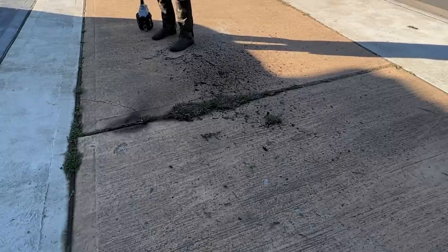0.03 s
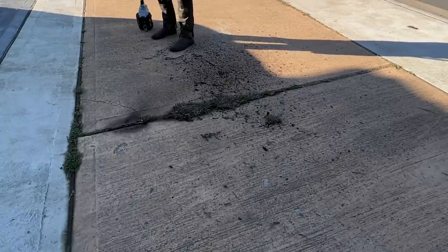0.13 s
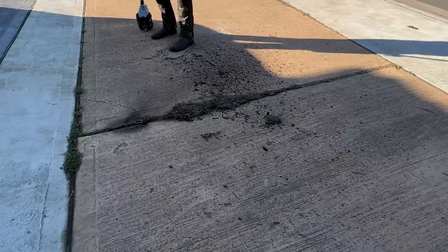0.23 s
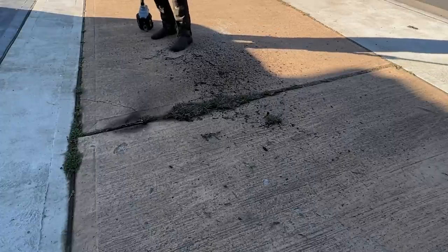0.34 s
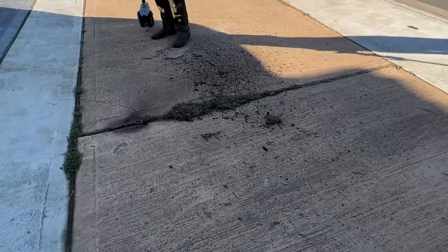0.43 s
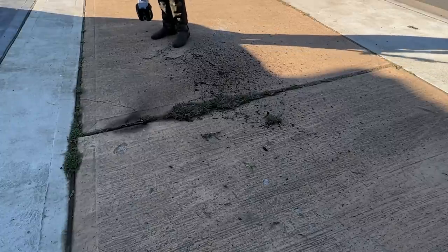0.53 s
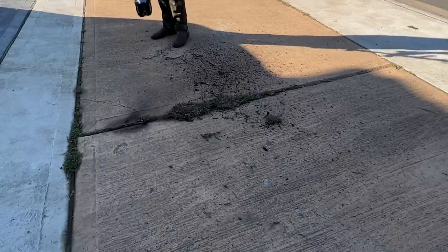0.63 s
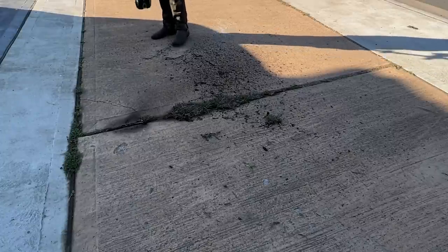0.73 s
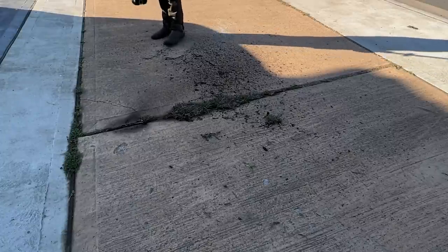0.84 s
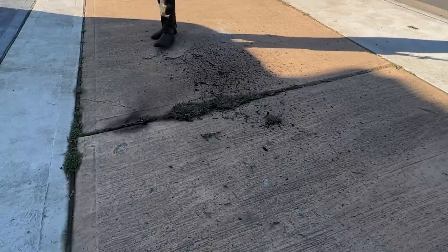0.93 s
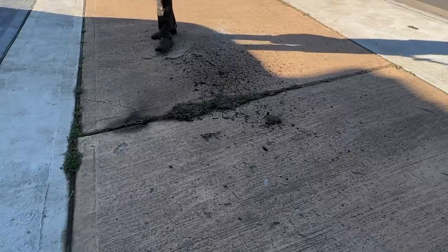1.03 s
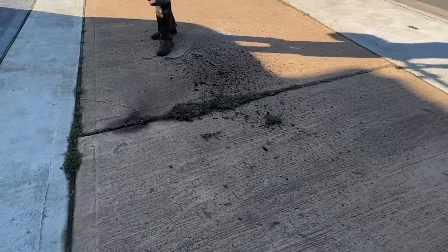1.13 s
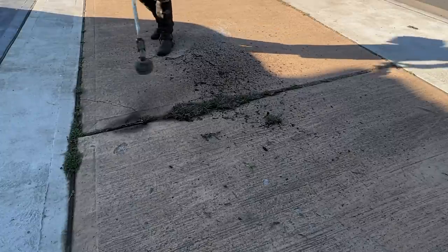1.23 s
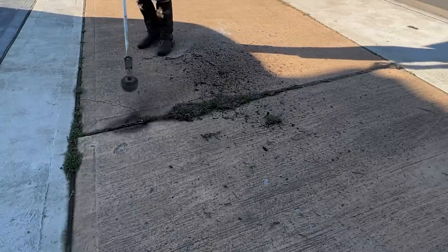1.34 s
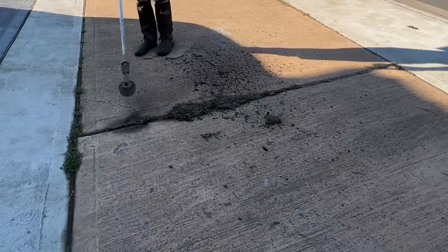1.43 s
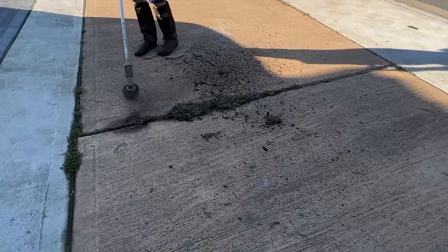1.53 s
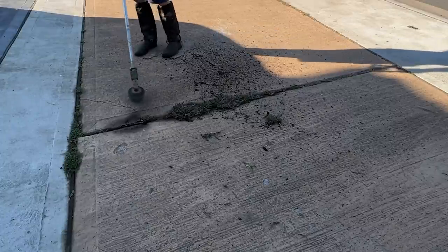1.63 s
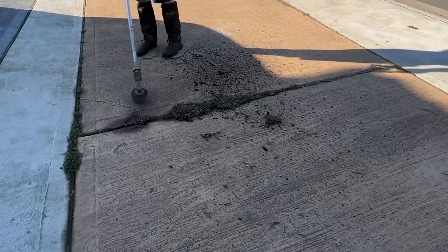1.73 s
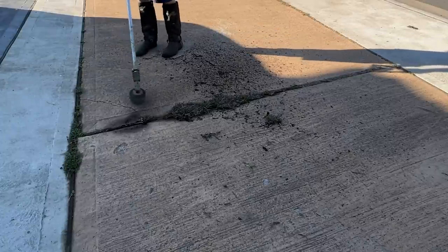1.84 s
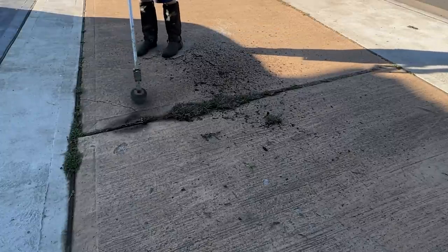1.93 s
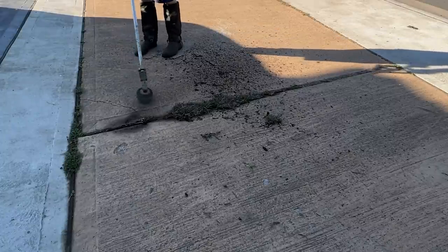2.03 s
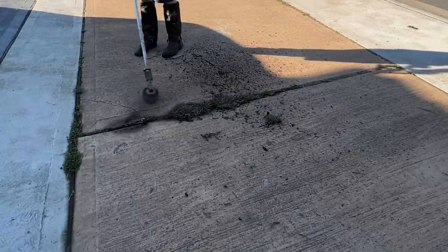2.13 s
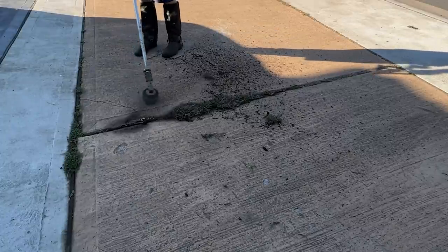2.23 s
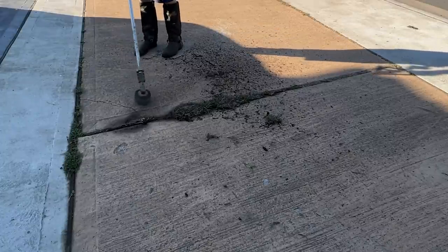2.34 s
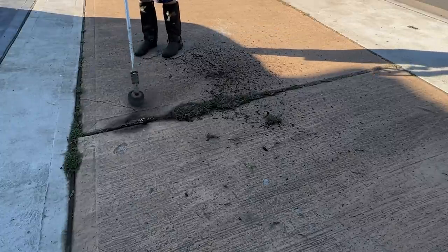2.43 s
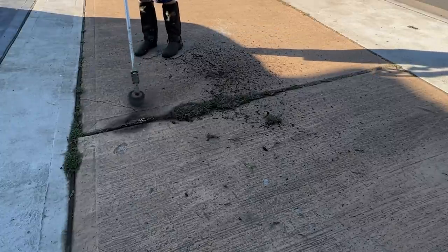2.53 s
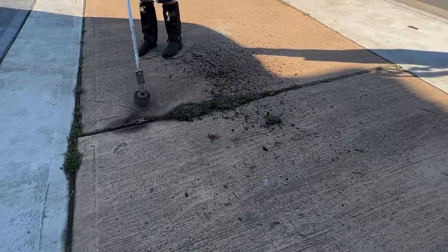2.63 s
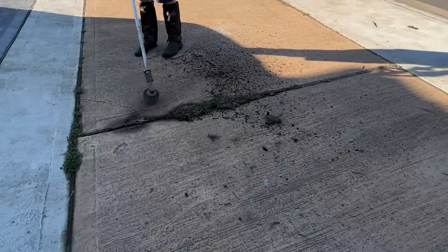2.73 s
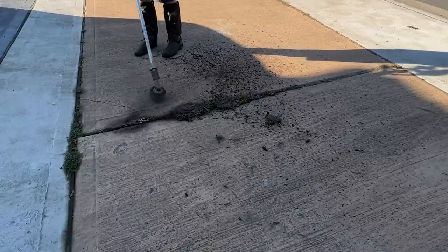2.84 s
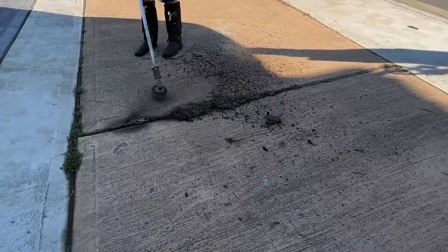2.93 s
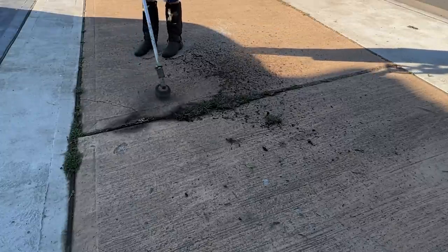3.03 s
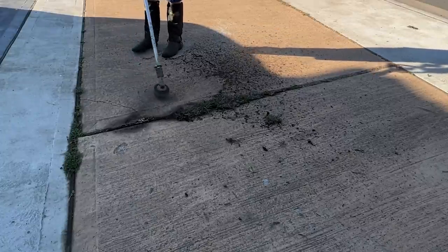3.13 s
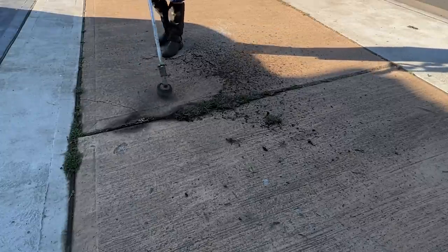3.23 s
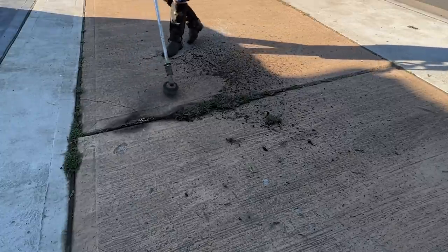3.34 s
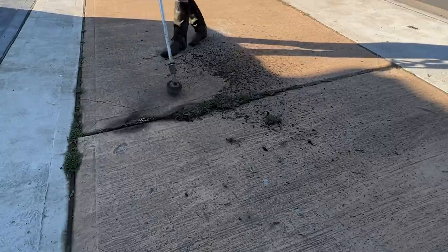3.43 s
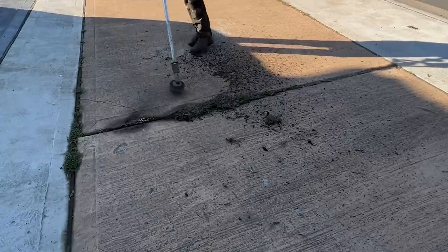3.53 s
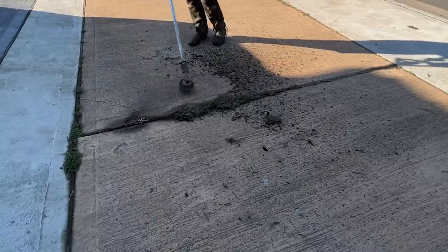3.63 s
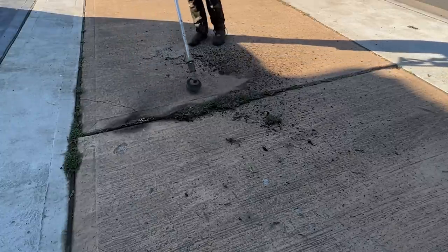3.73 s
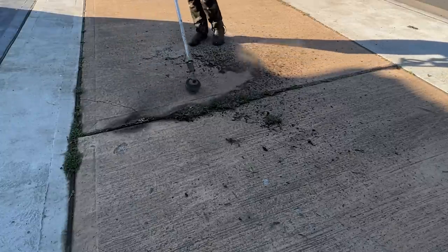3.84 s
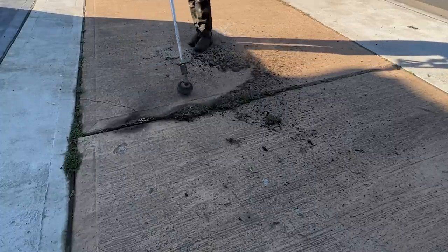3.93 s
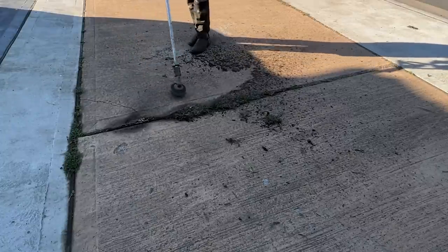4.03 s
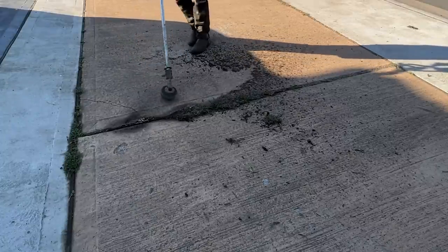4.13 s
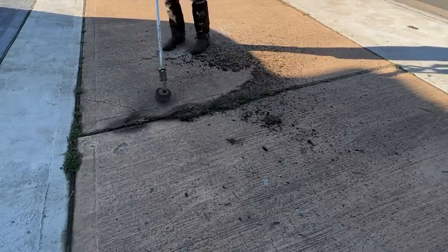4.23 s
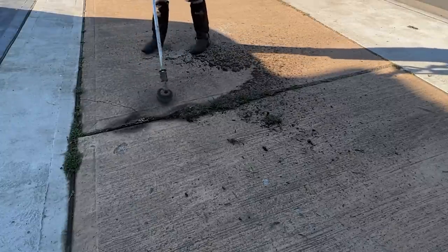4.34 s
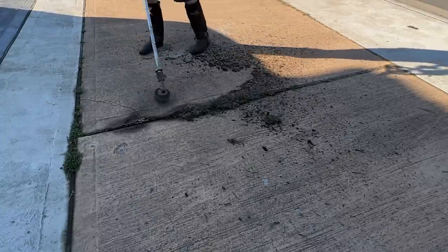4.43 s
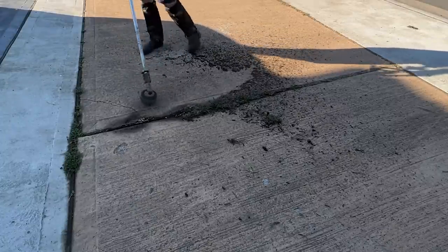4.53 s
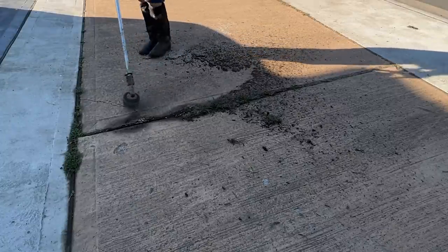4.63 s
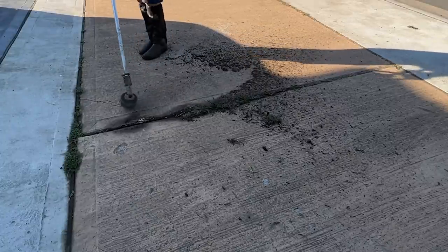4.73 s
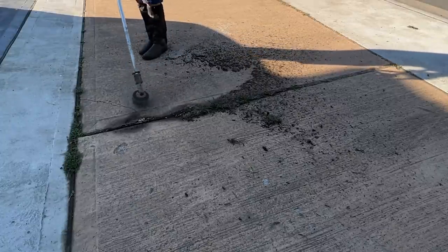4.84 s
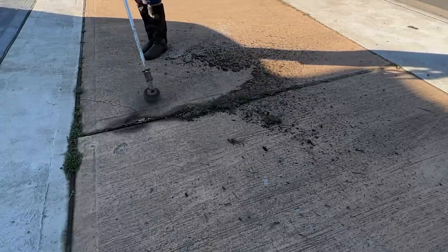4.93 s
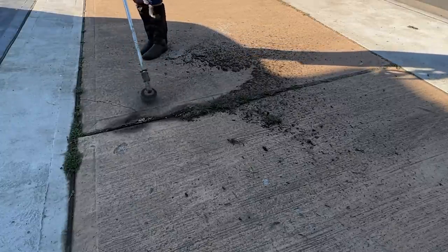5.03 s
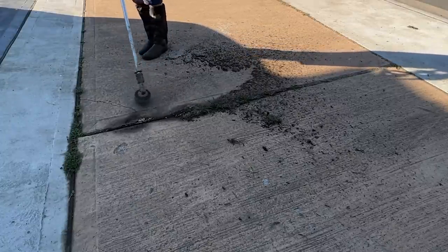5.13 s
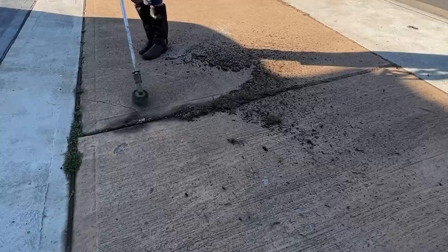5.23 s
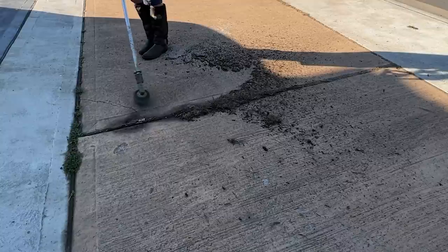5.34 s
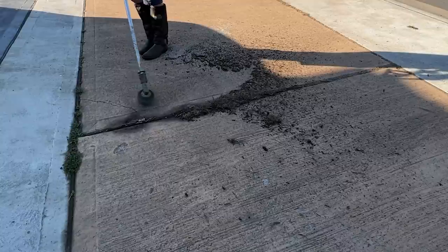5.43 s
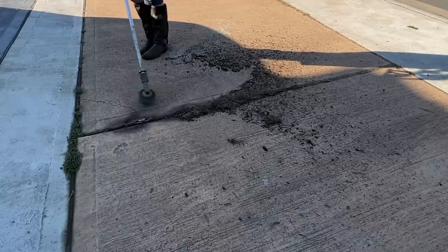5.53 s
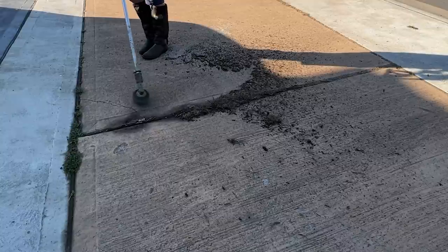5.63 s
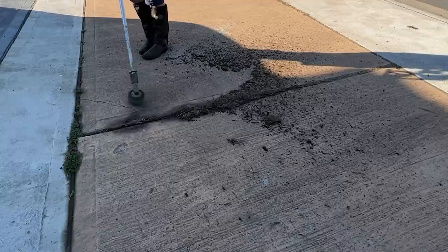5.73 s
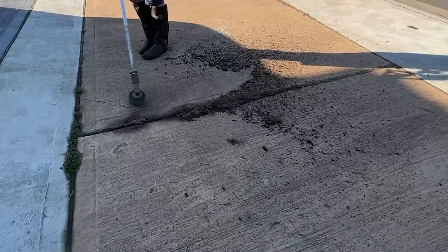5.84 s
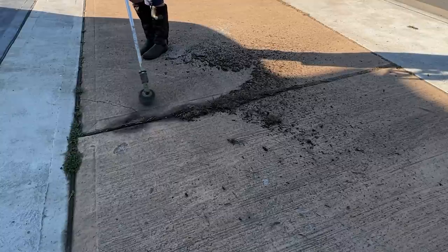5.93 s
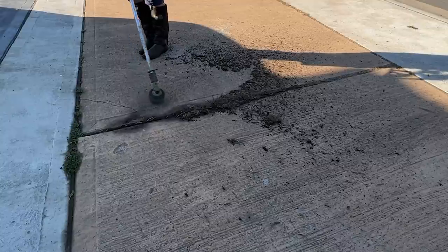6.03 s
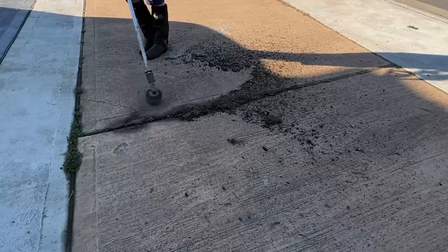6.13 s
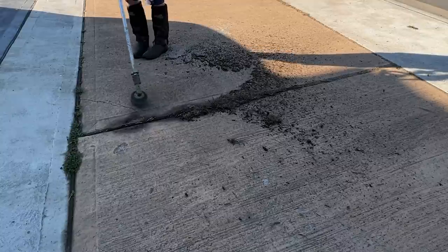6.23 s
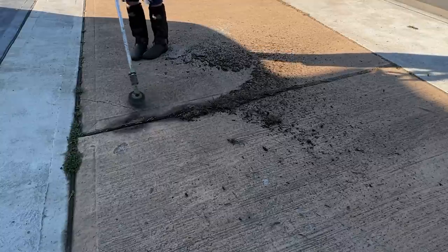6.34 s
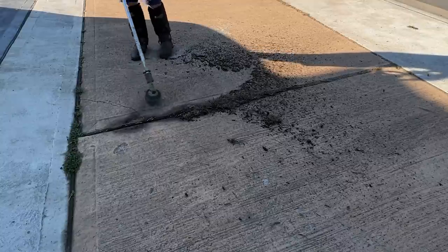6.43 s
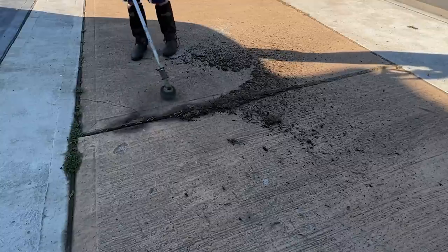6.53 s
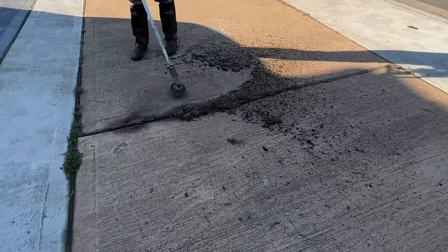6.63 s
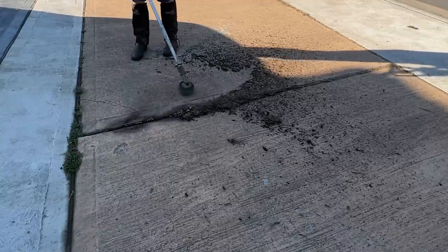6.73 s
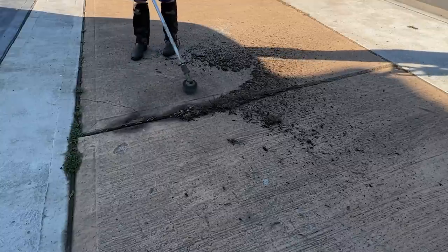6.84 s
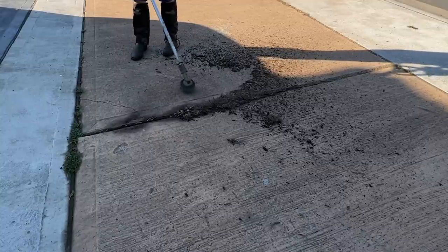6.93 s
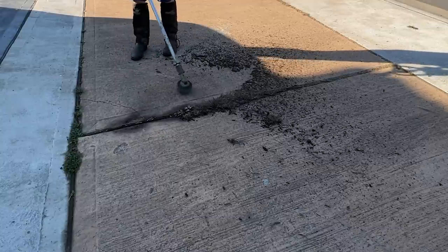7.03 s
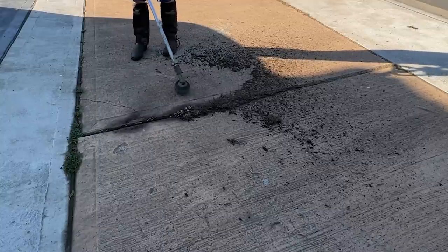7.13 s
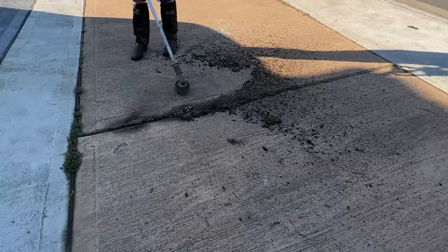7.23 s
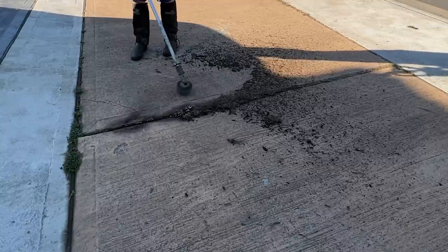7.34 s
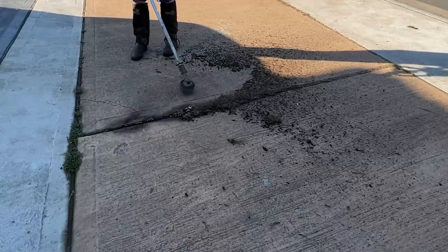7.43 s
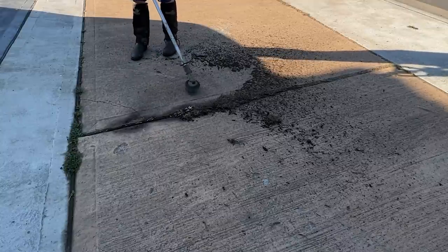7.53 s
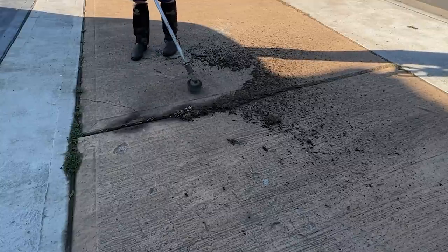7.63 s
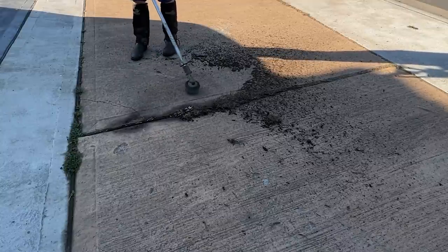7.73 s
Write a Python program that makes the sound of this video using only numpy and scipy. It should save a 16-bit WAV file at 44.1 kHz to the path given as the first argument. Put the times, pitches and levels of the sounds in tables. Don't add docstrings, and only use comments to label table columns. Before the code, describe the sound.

Soles scuff gravel over a faint far rumble for a second, then a short clutch squeal and knock start a battery trimmer. Its pitch climbs in half a second to a sharp electric whine with a strong whistling rush of spinning line. Repeated bites rasp through weeds, sagging the motor a little and spraying grit on hard ground. Open air, fairly close stationary microphone, dry sound, no stop at the end.

```python
import sys
import numpy as np
from scipy import signal
from scipy.fft import rfft, irfft, next_fast_len
from scipy.io import wavfile
from scipy.ndimage import uniform_filter1d

SR = 44100
rng = np.random.default_rng(int(sys.argv[2]) if len(sys.argv) > 2 else 0)


def undo_db(level):
    steps = np.asarray(level, float) / 20
    return 10 ** steps


def output_pcm(signal):
    pcm = np.clip(np.atleast_2d(signal).T, -1, 1) * 32767
    wavfile.write(sys.argv[1], SR, np.round(pcm).astype(np.int16))


N = 343539
TIME = np.arange(N) / SR
EARLY = TIME[:2 * SR]
FRAME_S = np.arange(N // 128 + 5) * 128 / SR
BIN_HZ = np.fft.rfftfreq(512, 1 / SR)[:, None]

# pitch_hz, level_db
RUMBLE_SPECTRUM = [(12, -70), (20, -42), (37, -14), (135, 0), (174, -5.5), (392, -11.5), (543, -10),
                   (600, -40), (780, -47), (1320, -120)]
RUMBLE_DB = -57
# pitch_hz, level_db
HUM_TONES = [(70.5, -66), (141, -61.5)]
# pitch_hz, density_db (per Hz)
SCUFF_SPECTRUM = [(150, -76), (250, -15), (395, -22), (540, -6), (737, -13.5), (1020, -10), (1380, -14),
                  (1840, -7), (2310, -21.5), (3000, -19), (3900, -29), (6600, -120)]
# pitch_hz, density_db (per Hz)
GRAVEL_SPECTRUM = [(1060, -31), (1800, -15), (2330, -18.5), (4780, -18.5), (6070, -25), (8730, -35),
                   (15000, -62)]
# start_s, length_s, scuff_db, gravel_db
STEPS = [
    (0, 0.045, -70, -60),
    (.07, .17, -57, -69),
    (.23, 0.054, -59, -65),
    (.355, 0.12, -55, -58),
    (.44, .14, -53.5, -56),
    (.76, 0.2, -62, -67),
    (.92, .13, -66, -67),
    (1.065, 0.042, -46, -60),
    (1.1, .06, -58, -41),
]
STEP_EDGE_S, STILL_SCUFF_DB, STILL_GRAVEL_DB = 0.039, -58, -73
# start_s, level_db, pitch_hz
STONES = [
    (.025, -45, 6000),
    (.25, -57, 7950),
    (.36, -47, 5500),
    (.62, -48, 6000),
    (.745, -39, 4060),
    (1.025, -61, 10000),
]

# time_s, half_length_s, squeal_db, knock_db
THROBS = [
    (1.07, 0.0038, -40.5, -64),
    (1.086, 0.0072, -34.5, -43.5),
    (1.108, 0.008, -48, -64),
]
SQUEAL_HZ, KNOCK_LEAD_S = 3350, 0.0077
# pitch_hz, width_hz, level_db
KNOCK_MODES = [(1136, 270, -8), (2050, 130, 12), (4450, 450, -26), (6800, 600, -43)]
# time_s, pitch_hz, level_db
WHIRR = [(1.12, 1120, -47), (1.19, 1210, -45), (1.25, 1696, -31), (1.33, 1790, -46), (1.4, 1950, -36.5),
         (1.45, 2050, -30), (1.5, 2124, -50), (1.54, 2220, -61)]
# time_s, pitch_hz, level_db
CHIRP = [(1.12, 9900, -80), (1.135, 9750, -64), (1.18, 9300, -68), (1.25, 8800, -64), (1.3, 8500, -80)]
# time_s, pitch_hz, level_db
GROAN = [(1.12, 340, -56), (1.16, 380, -54), (1.22, 390, -55), (1.28, 405, -51), (1.35, 456, -52),
         (1.42, 470, -56), (1.5, 480, -59)]

# time_s, mesh_hz, mesh_db, cutting_db
SPIN = [(1.07, 61, -65, -52), (1.14, 349, -53, -33.5), (1.2, 626.1, -50, -33), (1.3, 1002, -70, -47),
        (1.46, 1473, -60, -51), (1.5, 1556, -43, -46), (1.6, 1673, -38, -46), (1.66, 1732, -35, -47.5),
        (1.78, 1766, -35.5, -38.5), (1.86, 1833, -27.5, -43.5), (1.97, 1903, -39, -45),
        (2.08, 1918, -33, -41.5), (2.16, 1935, -44, -47.5), (2.35, 1948, -41.5, -45.5),
        (2.65, 1964, -41.5, -42), (3.6, 1992, -45, -46)]
MOTOR_TEETH, HEAD_TEETH, FULL_HZ = 16, 19, 1935
# time_s, half_length_s, load (0-1), cutting_rise_db
BITES = [(2.496, 0.087, 0.42, 4), (2.909, 0.11, 0.83, 2.5), (3.113, 0.067, 0.75, 5.5),
         (3.273, 0.068, 0.25, 3.5), (3.361, 0.045, 0.09, 2.5), (3.477, 0.11, 0.91, 6.5),
         (3.84, 0.083, 0.3, 1.8), (4.121, 0.11, 0.63, 4), (4.4, 0.15, 0.61, 6.5), (4.55, 0.042, 0.46, 1),
         (4.72, 0.12, 0.59, 3.5), (4.872, 0.088, 0.48, 5), (5.103, 0.11, 0.34, 2.5),
         (5.231, 0.088, 0.4, 1.8), (5.408, 0.13, 0.61, 4.5), (5.605, 0.13, 0.48, 3.5),
         (5.765, 0.082, 0.53, 2.5), (5.944, 0.088, 0.62, 6.5), (6.13, 0.099, 0.67, 6.5),
         (6.342, 0.075, 0.36, 4), (6.546, 0.1, 0.57, 6), (6.713, 0.13, 0.41, 3), (7.004, 0.11, 0.74, 6),
         (7.145, 0.05, 0.35, 6), (7.215, 0.11, 0.62, 3), (7.392, 0.1, 0.83, 5), (7.692, 0.14, 0.3, 4.5),
         (7.741, 0.078, 0.2, 1.5)]
SAG_HZ, MESH_DB_PER_LOAD, SIDE_DB = 100, 12, -38
# time_s, half_length_s, mesh_change_db, sideband_change_db
SLACK = [(1.69, 0.044, 1, 2), (2.05, 0.031, 1, -20), (2.14, 0.048, -15, -3), (2.43, 0.055, -3, -12),
         (2.66, 0.058, 4.5, -18), (2.99, 0.025, 0, -10), (3.17, 0.079, -4.5, 3), (3.23, 0.025, 10, -7),
         (3.36, 0.025, -1, -17), (3.56, 0.037, 1, -22), (4.03, 0.085, -3, -11), (4.26, 0.051, -27, -1.5),
         (4.66, 0.054, 1.5, -10), (4.95, 0.031, 4.5, -26), (5.02, 0.094, 3.5, 2.5), (5.49, 0.049, 4, -21),
         (5.77, 0.052, 4, -23), (5.85, 0.044, -24, -7), (6.16, .04, 0, -11), (6.38, 0.073, 0, -4),
         (6.51, 0.046, 4.5, -17), (6.62, 0.06, -10, 3.5), (6.79, 0.061, 4, -10), (7.33, 0.04, 3, -5),
         (7.57, 0.049, -3, 0.5), (7.66, .04, -13, -10), (7.77, 0.053, -18, -2.5), (2.43, 0.018, -10, 0),
         (2.54, 0.028, -17, -1), (3.58, 0.017, -6, -3), (4.5, .02, -7, 2), (4.62, .02, -10, 0),
         (6.07, .025, -8, 0), (6.21, 0.019, -7, 3), (6.33, 0.032, -4, -10), (6.46, 0.021, -8, -2),
         (6.88, 0.021, -4, 4.5), (7.19, .015, -7, 0), (7.45, .015, -4, 6), (7.58, 0.029, -5, 0)]
# order (multiple of shaft speed), level_db
SHAFT_ORDERS = [(10, -59), (17, -53.5), (27, -47.5), (28, -52), (29, -48), (30, -52)]
# time_s, half_length_s, order_17_db, order_10_db
CROSSINGS = [(1.59, 0.035, -37, -83), (1.806, 0.036, -42, -60), (1.953, .05, -40, -50),
             (2.045, 0.05, -49, -51), (2.785, 0.043, -60, -50), (2.92, .08, -42, -68),
             (3.36, 0.039, -50, -44), (3.501, 0.057, -53, -56), (4.2, 0.13, -47, -63),
             (4.551, 0.049, -42.5, -63), (5.95, 0.049, -42, -60), (7.15, .05, -40, -66)]
# time_s, half_length_s, level_db
THIN = [(3.75, .15, -50), (4.3, .15, -48), (5.12, .07, -42), (5.47, .09, -42), (5.72, .1, -39),
        (6.33, .09, -46), (6.8, .07, -44), (7.27, .05, -42), (7.46, .05, -42), (7.7, .06, -44)]
STRAND_S, STRAND_HALF_S, STRAND_DB = 1.52, 0.058, -39
# start_s, length_s, pass_db, second_db, third_db
SLAPS = [(1.62, 0.23, -62.5, -58.5, -69), (1.98, 0.35, -67, -51, -60), (2.33, 0.12, -61, -70, -57),
         (2.45, 0.17, -68, -56.5, -61), (2.62, 0.083, -56, -51, -55), (2.72, 0.29, -72, -50, -76),
         (3.0, 0.11, -80, -48, -46.5), (3.19, 0.089, -57, -46, -60), (3.33, 0.14, -60, -58, -49),
         (3.56, .42, -58, -50, -53.5), (4.0, 0.23, -55, -56, -53), (4.22, 0.08, -64, -70, -48.5),
         (4.42, 0.21, -61, -54, -61), (4.66, .24, -63, -54, -50.5), (4.92, 0.32, -58, -50, -55),
         (5.36, 0.098, -72, -53.5, -58), (5.7, 0.264, -56.5, -77, -55), (6.02, 0.19, -64, -50, -61),
         (6.18, 0.13, -57, -65, -67), (6.46, 0.23, -55.5, -50.5, -58), (6.68, 0.25, -52, -61, -45.5),
         (6.95, .14, -62, -50.5, -65), (7.1, 0.33, -50, -58, -53), (7.42, 0.45, -53.5, -56, -61)]
BETWEEN_SLAPS_DB, SLAP_EDGE_S = -76.5, 0.035

# pitch_hz, density_db (per Hz)
WHISTLE_SPECTRUM = [(800, -34), (1800, -21), (2600, -20), (3400, -19.5), (4980, -18), (5300, -11),
                    (7000, -5), (9500, -2.5), (10400, -2.5), (11200, -5), (12100, -9.5), (12900, -18),
                    (15700, -22.5), (17300, -25.5), (22000, -31.5)]
# time_s, crest_spacing_hz, echo (0-1), tip_speed (share of full), whistle_db
LOWERING = [(1.1, 1100, 0.2, .2, -66), (1.13, 1270, 0.2, 0.32, -57), (1.21, 1550, .55, 0.29, -31.5),
            (1.28, 1790, 0.5, 0.45, -23.5), (1.33, 2080, .6, 0.47, -25), (1.38, 2270, 0.8, 0.51, -22.5),
            (1.46, 2460, 0.9, 0.57, -26), (1.5, 2580, 0.2, 0.64, -23.5), (1.65, 2660, 0.8, 0.67, -25),
            (1.95, 2600, 1, 0.71, -23.5)]
# time_s, third_crest_hz (of the ground echo)
HEIGHT = [(1.55, 7400), (1.82, 8060), (2.11, 7500), (2.4, 7600), (2.6, 7810), (3.1, 7637), (3.35, 8020),
          (3.65, 7100), (3.85, 6970), (4.38, 8100), (4.62, 7026), (5.03, 8586), (5.7, 8450), (6.15, 7995),
          (6.45, 8220), (6.82, 8550), (7.2, 8296), (7.6, 8430)]
# pitch_hz, half_width_hz,
# before_db, after_db
WHISTLE_COLOUR = [(4590, 570, -4, -5), (6000, 900, -1, -1), (9050, 290, 3, 3.5), (7080, 220, 0.5, -4.5),
                  (9600, 140, -8, 6.5), (9982, 2010, 8, 7)]
TURN_S, WHISTLE_DB_PER_LOAD = 4.72, -1

# pitch_hz, density_db (per Hz)
CUT_SPECTRUM = [(15, -51), (25, -21), (150, -23), (313, -8.5), (549, -8.5), (617, -5), (1110, -12),
                (1910, -2), (2230, -12), (2600, -18), (3380, -27), (5720, -120)]
# pitch_hz, density_db (per Hz)
GRIT_SPECTRUM = [(1400, -15.5), (2400, -7.5), (2950, 4), (3330, 2), (3800, -1.5), (4400, -3), (6500, -5),
                 (12000, -25), (16000, -42)]
GRIT_DB, GRIT_PER_CUT, GRIT_DB_PER_LOAD = -42, 0.9, 1.5
GUST_S, GUST_HALF_S, GUST_DB = 1.248, 0.072, 22

# time_s, half_length_s, level_db
FLARES = [(5.595, 0.11, -43), (5.8, .12, -43.5), (6.521, .14, -40), (6.999, .08, -39.5), (7.18, 0.06, -36),
          (7.43, 0.06, -36)]
HOUSING_HZ, HOUSING_WIDTH_HZ = 3345, 44

# pitch_hz, width_hz
OPPOSED_SLOTS = [(2182, 24), (3702, 24), (6328, 24), (6539, 24), (6915, 24), (6985, 24), (7640, 24),
                 (7969, 24), (8533, 24), (8790, 24), (9142, 24), (9399, 24),
                 (9446, 27), (9609, 30), (9726, 22), (9820, 27), (10090, 48), (10243, 27), (10406, 24),
                (10476, 24), (10734, 24), (10944, 24), (11227, 24), (11461, 24), (11532, 27), (11741, 24),
                (11999, 24), (12069, 24), (12235, 27), (12376, 24), (12468, 24), (12585, 27), (12632, 24),
                (12867, 27), (12986, 75), (13065, 51), (13244, 27), (13289, 30), (13419, 48), (13488, 51),
                (13629, 54), (13687, 30), (13818, 54), (13886, 51), (13971, 27), (14015, 30), (14085, 19),
                (14181, 27), (14227, 27), (14297, 27), (14437, 70), (14815, 24), (14881, 75), (15049, 73),
                (15116, 30), (15163, 27), (15258, 75), (15364, 51), (15551, 48), (15632, 27), (15714, 51)]
RIPPLE_HZ, RIPPLE_ECHO, ONE_SLOT_HZ = 23.4375, 0.24, 24
CORE_HZ, SKIRT_HZ, SKIRT_SHARE = 11, 30, 0.14


def evened(x):
    return x / np.sqrt(np.mean(x ** 2) + 1e-20)


def read(points, hz):
    f, value = np.transpose(points)
    return np.interp(np.log(hz + 1), np.log(f + 1), value)


def column(table, k, t=TIME, left=-120):
    rows = np.array(table)
    return np.interp(t, rows[:, 0], rows[:, k], left=left)


def drift(size):
    noise = rng.standard_normal(N)
    return evened(uniform_filter1d(uniform_filter1d(noise, size), size))


def resonate(x, hz, width):
    turn = np.exp(2j * np.pi * np.cumsum(hz + 0 * x) / SR)
    r = np.exp(-np.pi * width / SR)
    return 2 * (turn * signal.lfilter([1 - r], [1, -r], x / turn)).real


def air(shape_db, patchy_db, flicker_db):
    a, b, patches = rng.standard_normal((len(FRAME_S), 257, 3)).T
    patches = evened(uniform_filter1d(uniform_filter1d(patches, 6, 0), 16, 1))
    flicker = evened(uniform_filter1d(rng.standard_normal(len(FRAME_S)), 5))
    shape = undo_db(shape_db + 0 * FRAME_S)
    shape = shape / np.sqrt((shape ** 2).mean(0))
    z = (a + 1j * b) * shape * undo_db(patchy_db * patches + flicker_db * flicker)
    return evened(signal.istft(z, nperseg=512, noverlap=384)[1][:N])


def bell(t, centre, half):
    return np.exp(-((t - centre) / half) ** 2)


def bumps(rows, k, t=TIME):
    total = sum(row[k] * bell(FRAME_S, row[0], row[1]) for row in rows)
    return np.interp(t, FRAME_S, total)


def held(rows, k, edge_s, rest_db):
    total = 0
    for row in rows:
        inside_s = np.minimum(FRAME_S - row[0], row[0] + row[1] - FRAME_S)
        total = total + undo_db(row[k]) * np.clip(inside_s / edge_s + 0.5, 0, 1) ** 2
    return undo_db(rest_db) + np.interp(TIME, FRAME_S, total)


def yard():
    size = next_fast_len(N)
    white = rfft(rng.standard_normal(N), size)
    rumble_gain = undo_db(read(RUMBLE_SPECTRUM, np.fft.rfftfreq(size, 1 / SR)))
    rumble = evened(irfft(white * rumble_gain, size)[:N])
    tones = sum(undo_db(db) * np.sin(2 * np.pi * hz * TIME) for hz, db in HUM_TONES)
    hum = undo_db(0.47 * drift(size=3000)) * tones
    far = undo_db(RUMBLE_DB - 6.0 + 3.6 * drift(size=1500)) * rumble + hum
    ducked_db = np.interp(TIME, [1.25, 1.55], [0, -9])

    scuff = air(read(SCUFF_SPECTRUM, BIN_HZ), patchy_db=2.0, flicker_db=-0.5)
    soles = held(STEPS, 2, STEP_EDGE_S, STILL_SCUFF_DB) * scuff
    crunch = air(read(GRAVEL_SPECTRUM, BIN_HZ), patchy_db=4.0, flicker_db=0.0)
    gravel = held(STEPS, 3, STEP_EDGE_S, STILL_GRAVEL_DB) * crunch + stones()
    feet_stop = np.clip((1.13 - TIME) / 0.042, 0, 1)
    return undo_db(ducked_db) * far + (soles + gravel) * feet_stop


def stones():
    noise = rng.standard_normal(N)[:len(EARLY)]
    out = np.zeros(N)
    for s, db, hz in STONES:
        attack = np.clip((EARLY - s + 0.004) / 0.004, 0, 1)
        decay = np.exp(-(np.maximum(EARLY - s, 0) / 0.02) ** 2)
        grain = evened(resonate(resonate(noise, hz, 2200), hz, 2100))
        out[:len(EARLY)] += undo_db(db - 16) * attack * decay * grain
    return out


def start():
    waver_hz = 45 * drift(size=60)[:len(EARLY)]
    squeal_hz = SQUEAL_HZ - 2200 * (EARLY - 1.085) + waver_hz
    squeal = np.sqrt(2) * np.sin(2 * np.pi * np.cumsum(squeal_hz) / SR)
    noise = rng.standard_normal(N)[:len(EARLY)]
    knock = evened(sum(undo_db(db) * resonate(noise, hz, width) for hz, width, db in KNOCK_MODES))
    throbs = [(s, half, undo_db(squeal_db), undo_db(knock_db)) for s, half, squeal_db, knock_db in THROBS]
    out = bumps(throbs, k=2, t=EARLY) * squeal
    out += bumps(throbs, k=3, t=EARLY + KNOCK_LEAD_S) * knock
    for path, width_hz in [(WHIRR, 110), (CHIRP, 120), (GROAN, 40)]:
        path_hz = column(path, 1, EARLY, left=path[0][1])
        glide = evened(resonate(noise, path_hz, width_hz))
        out += undo_db(column(path, 2, EARLY)) * glide * (EARLY < path[-1][0])
    return np.pad(out, (0, N - len(EARLY)))


def gears():
    load = bumps(BITES, k=2)
    mesh_hz = column(SPIN, 1, left=0.92) - SAG_HZ * load
    shaft = 2 * np.pi * np.cumsum(mesh_hz) / SR / MOTOR_TEETH
    passes = 2 * shaft * MOTOR_TEETH / HEAD_TEETH
    speed_db = 40 * np.log10(mesh_hz / FULL_HZ)
    load_db = 3.5 * speed_db + 0.75 * (grit_db() + 36)
    play = 0.005 * drift(size=300) + 0.024 * drift(size=1200)
    loose = shaft + play

    mesh_db = column(SPIN, 2) + MESH_DB_PER_LOAD * load + bumps(SLACK, k=2) + 2.1 * drift(size=500)
    out = undo_db(mesh_db) * np.sin(MOTOR_TEETH * loose)
    rise_db = np.clip(5.5 * speed_db, -60, 0) * (TIME < 2.2)
    side_db = SIDE_DB + rise_db + bumps(SLACK, k=3) + 2.0 * drift(size=500)
    out += undo_db(side_db) * np.sin((MOTOR_TEETH - 1) * loose)
    for order, db in SHAFT_ORDERS:
        out += undo_db(db + load_db + 3.05 * drift(size=4000)) * np.sin(order * loose)

    out += undo_db(STRAND_DB) * bell(TIME, STRAND_S, STRAND_HALF_S) * np.sin(27 * loose)
    crossings = [(s, half, undo_db(upper_db), undo_db(tenth_db)) for s, half, upper_db, tenth_db in CROSSINGS]
    out += bumps(crossings, k=2) * np.sin((MOTOR_TEETH + 1) * loose)
    out += bumps(crossings, k=3) * np.sin(10 * loose)
    thin = [(s, half, undo_db(db)) for s, half, db in THIN]
    out += bumps(thin, k=2) * np.sin(30 * (shaft + play / 2))

    for k in range(1, 4):
        thump = held(SLAPS, 1 + k, SLAP_EDGE_S, BETWEEN_SLAPS_DB) * (TIME > SPIN[0][0])
        out += thump * undo_db(2.7 * drift(size=1500)) * np.sin(k * passes)
    for k, db in [(4, -60.5), (5, -66.5)]:
        out += undo_db(db + speed_db + 4.9 * drift(size=4000)) * np.sin(k * passes)
    return np.sqrt(2) * out, passes


def whistle(passes):
    speed = np.clip(column(LOWERING, 3, FRAME_S, left=0.13), 0.05, 1.1)
    down = np.clip((FRAME_S - 1.55) / 0.2, 0, 1)
    working_hz = column(HEIGHT, 1, FRAME_S, left=7000) / 3
    lowering_hz = column(LOWERING, 1, FRAME_S, left=950)
    crest_hz = down * working_hz + (1 - down) * lowering_hz
    crest = BIN_HZ / crest_hz
    smooth = np.exp(-(crest / 2.87) ** 4) * (1 - down * np.exp(-(crest / 2.58) ** 4))
    strength = np.clip(column(LOWERING, 2, FRAME_S, left=0.4), 0, 0.9) * smooth
    delay = np.exp(2j * np.pi * crest)
    echo = np.abs((1 + 0.13 * smooth * delay) / (1 - 0.65 * strength * delay))

    turned = np.clip((FRAME_S - TURN_S) / 0.088, 0, 1)
    colour_db = 0
    for hz, half, before, after in WHISTLE_COLOUR:
        colour_db = colour_db + down * (before + (after - before) * turned) * bell(BIN_HZ, hz, half)
    fizz_loss_db = 10 * np.clip(BIN_HZ / 3000 - 3.7, 0, 1.6)
    dull_db = (1 - down) * (4 * bell(crest, 2.3, 0.25) - 4 * bell(crest, 3.2, 0.71) - fizz_loss_db)
    shape_db = colour_db + dull_db + read(WHISTLE_SPECTRUM, BIN_HZ / speed) + 20 * np.log10(echo)
    hiss = air(shape_db, patchy_db=1.61, flicker_db=0.92)
    level_db = column(LOWERING, 4) + WHISTLE_DB_PER_LOAD * bumps(BITES, k=2)
    return undo_db(level_db) * hiss * (1 + 0.054 * np.cos(passes) + 0.039 * np.cos(passes / 2))


def cutting(passes):
    bass_loss_db = 9 * (BIN_HZ < 330) + 6 * (BIN_HZ < 130)
    unloaded = np.clip((1.9 - FRAME_S) / 0.45, 0, 1) * (FRAME_S > 1.3)
    stems = air(read(CUT_SPECTRUM, BIN_HZ) - bass_loss_db * unloaded, patchy_db=2.5, flicker_db=1.5)
    whip = stems * (1 + 0.031 * np.cos(passes))
    whip_level = undo_db(column(SPIN, 3) + 1.31 * bumps(BITES, k=3)) * np.clip((TIME - 1.09) / 0.11, 0, 1)

    hits = undo_db(0.97 * rng.exponential(1, N)) * (rng.random(N) < 150 / SR)
    ticks = 2.5 + uniform_filter1d(hits, 40) * 7
    grit = evened(air(read(GRIT_SPECTRUM, BIN_HZ), patchy_db=2.0, flicker_db=2.0) * ticks)
    grit_rise = (TIME > SPIN[1][0]) * np.clip((TIME - 1.3) / 0.5, 0.05, 1)
    return whip_level * whip + undo_db(grit_db()) * grit * grit_rise


def grit_db():
    gust = GUST_DB * bell(TIME, GUST_S, GUST_HALF_S) + 14 * np.clip((1.7 - TIME) / 0.53, 0, 1)
    return GRIT_DB + GRIT_PER_CUT * bumps(BITES, k=3) + GRIT_DB_PER_LOAD * bumps(BITES, k=2) + gust


def housing():
    ring = evened(resonate(rng.standard_normal(N), HOUSING_HZ, HOUSING_WIDTH_HZ))
    return bumps([(s, half, undo_db(db)) for s, half, db in FLARES], k=2) * ring


def scene():
    tones, passes = gears()
    mono = yard() + start() + tones + whistle(passes) + cutting(passes) + housing()
    return np.array([mono, mono])


def top_cut(x):
    return signal.sosfilt(signal.butter(12, 15720, fs=SR, output="sos"), x)


def record(dry):
    size = next_fast_len(N + SR)
    hz = np.fft.rfftfreq(size, 1 / SR)
    grid = np.arange(0, SR / 2, 2)
    limited = 0.31 * np.tanh(dry[0] / 0.29)
    z = rfft(limited, size) * (1 + RIPPLE_ECHO * np.exp(-2j * np.pi * hz / RIPPLE_HZ))

    centre, width = np.array(OPPOSED_SLOTS, float).T[:, :, None]
    off = np.maximum(abs(grid - centre) - (width - ONE_SLOT_HZ) / 2, 0)
    core = (1 - SKIRT_SHARE) * np.exp(-(off / CORE_HZ) ** 2)
    skirt = SKIRT_SHARE * np.exp(-(off / SKIRT_HZ) ** 1.3)
    share = np.interp(hz, grid, 0.93 * np.clip((core + skirt).sum(0), 0, 1))
    turn = np.interp(hz, grid, np.cumsum(rng.normal(0, 1.1, len(grid))))
    mid_z = z * np.sqrt(1 - share)
    side_z = z * np.sqrt(share) * np.exp(1j * turn)
    mid, side = irfft([mid_z, side_z], size)[:, :N]
    return top_cut(np.array([mid + side, mid - side]))


dry = scene()
out = record(dry)
output_pcm(out)
```